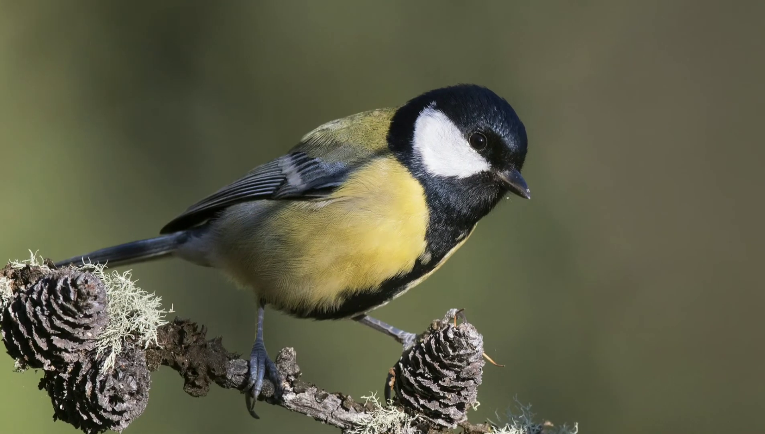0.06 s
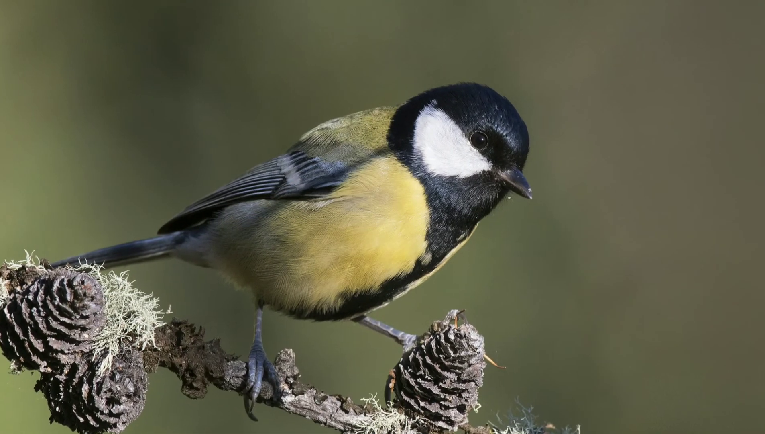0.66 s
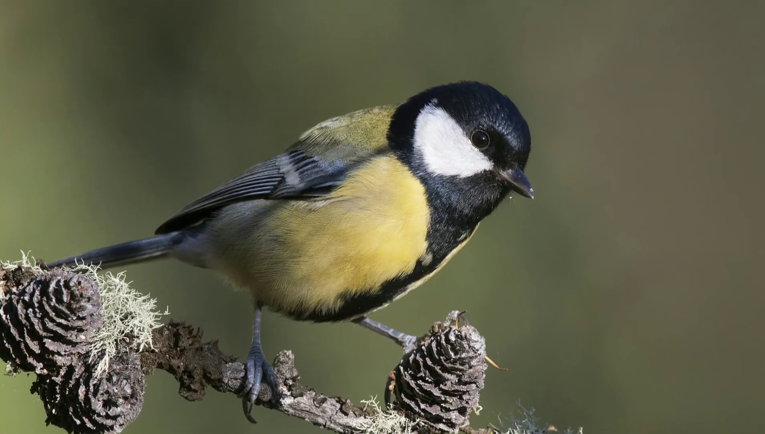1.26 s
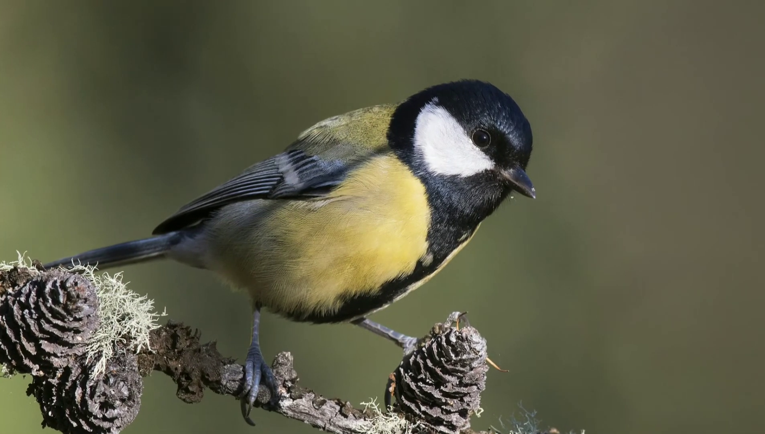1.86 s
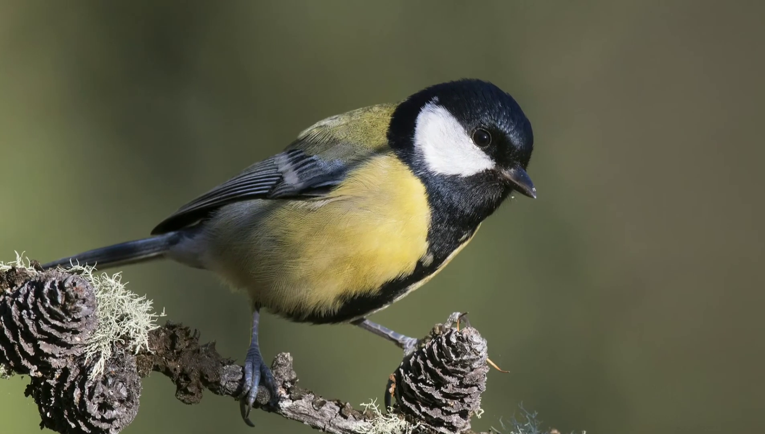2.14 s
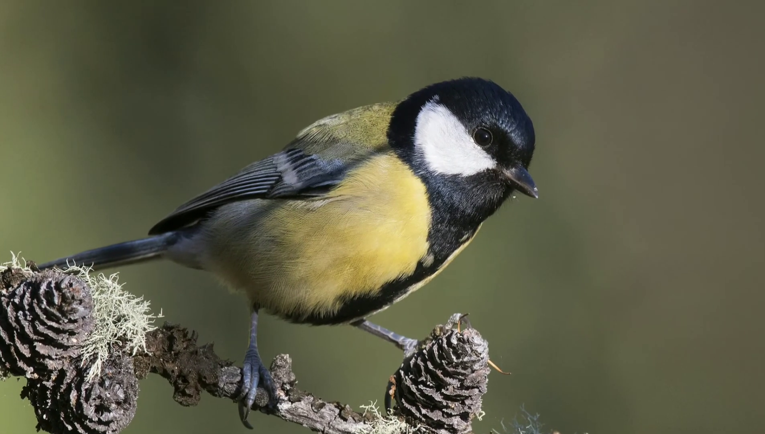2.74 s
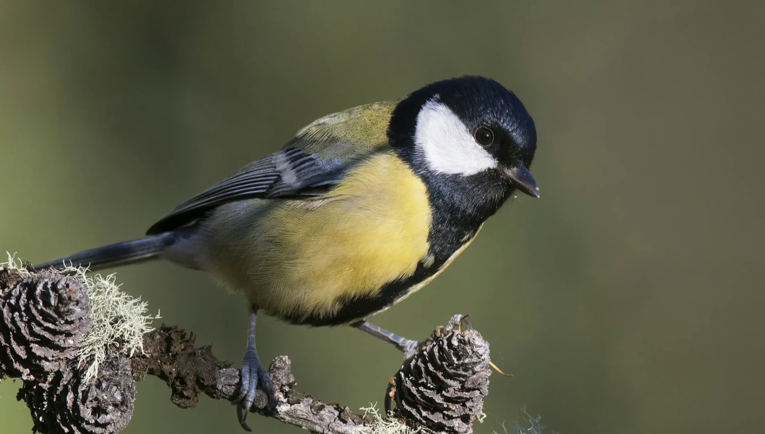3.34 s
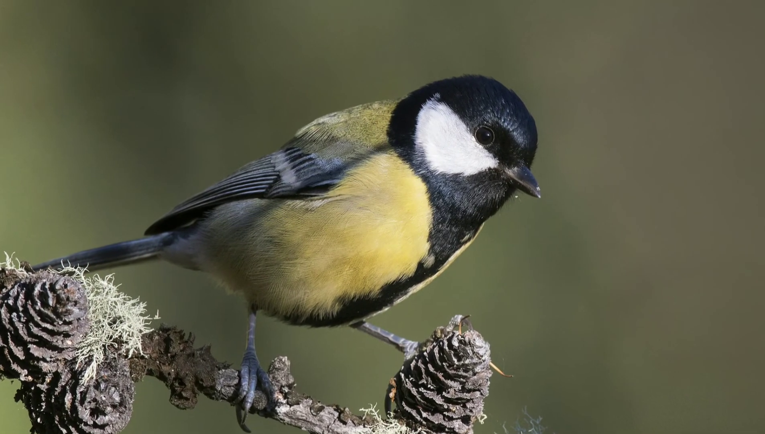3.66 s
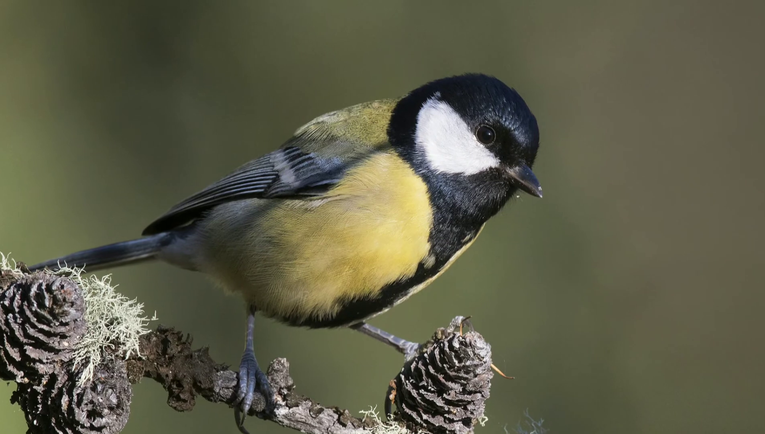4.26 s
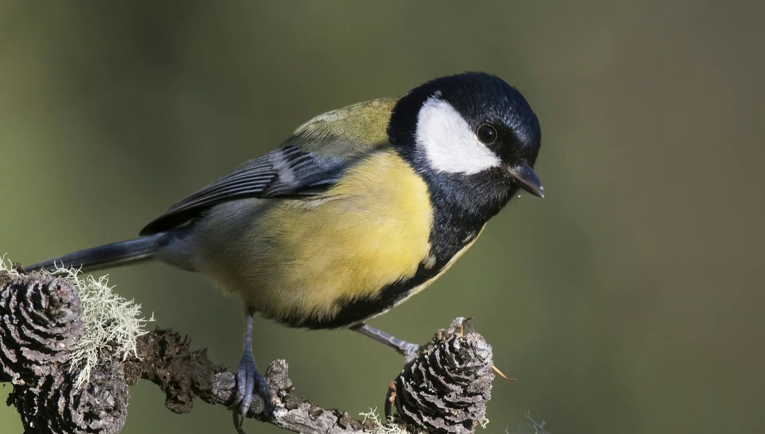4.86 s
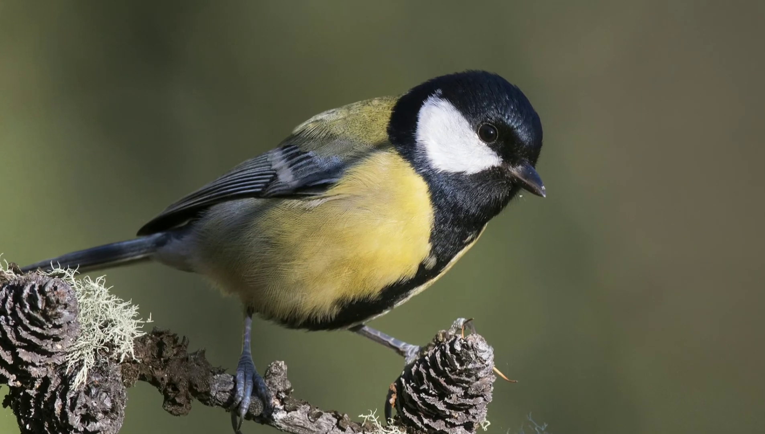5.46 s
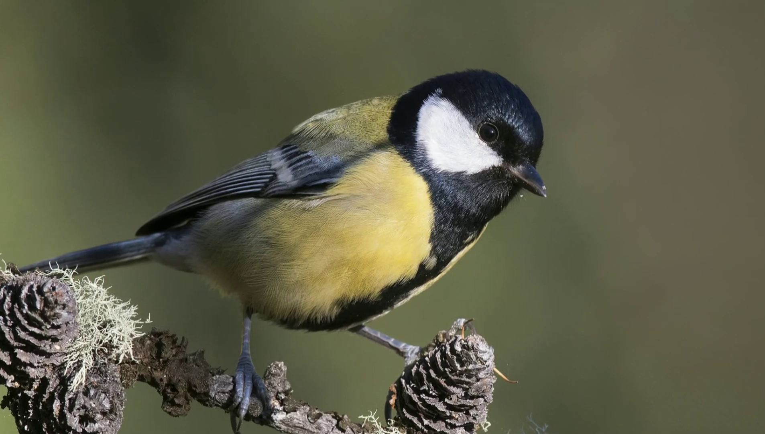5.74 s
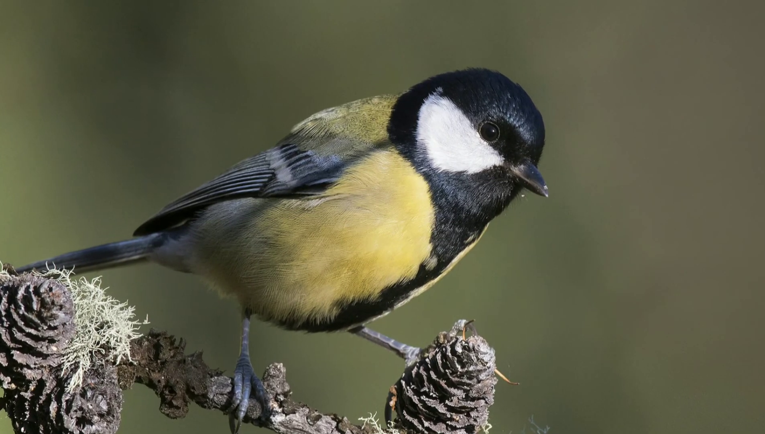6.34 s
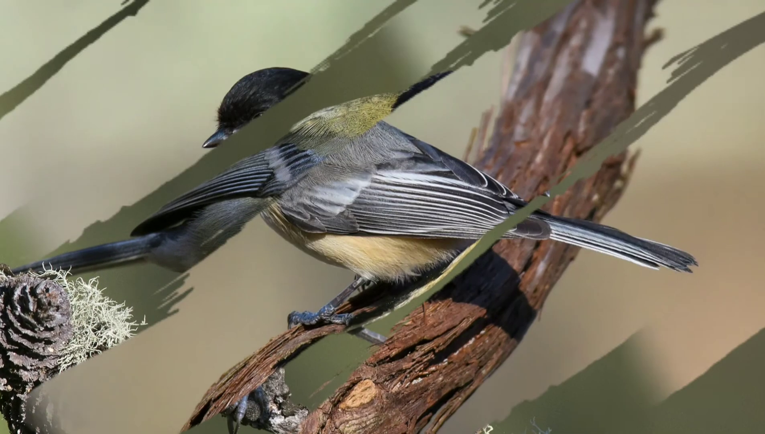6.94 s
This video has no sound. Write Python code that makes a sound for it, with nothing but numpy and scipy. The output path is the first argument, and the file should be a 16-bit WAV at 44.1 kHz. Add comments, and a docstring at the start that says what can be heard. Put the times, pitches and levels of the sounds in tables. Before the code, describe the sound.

A small songbird sings quick two-note phrases, pauses, then gives high buzzes and falling whistles over a light outdoor hiss.

```python
"""A great tit among trees, heard on one microphone, with other birds calling faintly far off.
It opens with a see-saw of a buzzy high note and a pure low one, which stops dead after two seconds.
A pause follows; then, over a duller hiss, come high buzzes and falling slurs that jump to a thin whistle.
Each note is a near-sine from the syrinx, shaken into a buzz when the membrane trembles.
On the way to the microphone, trunks and foliage scatter the notes into a long tail."""
import sys
import numpy as np
from scipy import signal
from scipy.fft import rfft, irfft
from scipy.io import wavfile
from scipy.ndimage import uniform_filter1d, minimum_filter1d

SR = 44100
rng = np.random.default_rng(int(sys.argv[2]) if len(sys.argv) > 2 else 0)


def pcm_store(signal):
    """Save signal as 16-bit PCM."""
    levels = np.round(np.clip(np.atleast_2d(signal), -1, 1) * 32767)
    wavfile.write(sys.argv[1], SR, levels.astype(np.int16).T)


N = 317520
SEE_SAW_ENDS_S, DULL_HISS_STARTS_S = 2.249, 3.335
WOOD_T60_S, NEAR_T60_S, TREBLE_T60_S = 0.92, 0.21, 0.64


def see_saw_song(t):
    """The near bird alternates two notes; a low one is still dying away among the trees as it opens."""
    # Each row: start in seconds, length in seconds, top pitch in Hz, time to the crest in seconds,
    # relative level in dB.
    low_notes = [(0.306, 0.12, 3993, 0.063, -9), (0.798, 0.14, 3921, 0.048, -7.5),
                 (1.282, 0.13, 3954, 0.049, -9), (1.774, .135, 3986, 0.11, -11.5)]
    # Each row: start in seconds, length in seconds, pitch in Hz, flick in Hz, glide in Hz per second,
    # buzz swing in Hz, relative level in dB.
    buzzy_notes = [ (.000, 0.09, 4988, 1400, -4000, 122, -12.5), (.516, 0.087, 4945, 1348, -2200, 115, -12),
                   (1.005, 0.11, 5014, 1400, -3000, 120, -11.5),
                   (1.488, 0.097, 5000, 1905, -4000, 139, -12.5),
                   (1.991, 0.093, 4860, 1986, 2199.5, 55.1, -14)]
    notes = sing(low_note, low_notes) + sing(buzzy_note, buzzy_notes)
    lingering = from_db(-31) * band_noise(hz=3850, width_hz=190) * from_db(-60 * t / WOOD_T60_S)
    song = from_db(-2) * wood(notes, near_db=-2.5, far_db=-11) + lingering
    return song * fade(SEE_SAW_ENDS_S - t, .003)


def slurred_song():
    """The near bird again: high buzz, falling slur, a leap to the whistle and a short buzz to close."""
    # Each row: start in seconds, length in seconds, base pitch in Hz, opening flick in Hz,
    # sag in Hz per second, relative level in dB.
    slurs = [(4.02, .24, 3319, 1517, 1297, -7), (4.604, 0.22, 3285, 203, 1461, -8),
             (6.912, .234, 3327, 1150, 1165, -8)]
    # Each row: start in seconds, length in seconds, pitch in Hz, leap in Hz, attack in seconds,
    # relative level in dB.
    whistles = [ (4.265, 0.032, 4544, 1936, 0.0027, -12.5), (4.307, 0.051, 4525, 297, 0.0059, -10.5),
                (4.837, 0.062, 4500, 1945, 0.0024, -10.5), (4.905, 0.047, 4540, 100, 0.016, -16.5),
                (7.149, 0.083, 4604, 1700, 0.0042, -12.5)]
    # Each row: start in seconds, length in seconds, pitch in Hz, glide in Hz per second, bend in Hz,
    # relative opening level in dB, swell in dB per second.
    high_buzzes = [ (3.662, .25, 6137, 2550, -70, -26.5, 0.5), (4.387, 0.056, 6160, 7070, 110, -19, -120),
                   (4.946, 0.08, 6057, 3470, 96, -17.5, -95), (6.56, .145, 6236, 1537, 66.5, -31.5, 69),
                   (6.686, .11, 6214, 400, -31, -30.5, 62.5)]
    pure = sing(slur, slurs) + sing(whistle, whistles)
    # throat and open beak pass only a band around the high notes
    beak = signal.butter(3, (5330, 7370), "band", fs=SR, output="sos")
    buzzes = signal.sosfilt(beak, sing(high_buzz, high_buzzes))
    return from_db(-1.5) * wood(pure + buzzes, near_db=-7.5, far_db=-10.5)


def syrinx(t, pitch, level_db, swing_hz=0, tremor_hz=212, throb=0, attack_s=0.0042,
           waver_hz=10, octave_db=-55, release_s=.018):
    """One gliding near-sine; a fast tremor of the membrane swings its pitch and loudness into a buzz."""
    wavering = pitch + waver_hz * drift(250, len(t))
    shake = 2 * np.pi * np.cumsum(tremor_hz * (1 + 0.084 * drift(90, len(t)))) / SR
    phase = 2 * np.pi * np.cumsum(wavering + swing_hz * np.cos(shake)) / SR
    # the loudness throbs at the tremor's rate, deeper as the note takes hold
    pulsing = rms_one(1 - throb * fade(t, 0.012) * np.cos(shake + 1.52))
    gain = from_db(level_db) * pulsing * fade(t, attack_s) * fade(t[-1] - t, release_s)
    return np.sqrt(2) * gain * (np.sin(phase) + from_db(octave_db) * np.sin(2 * phase))


def low_note(t, hz, crest_s, db, scoop_hz=262.3, scoop_s=0.04):
    """A nearly pure note that scoops up to its pitch, with a faint rasp just under it."""
    pitch = hz - scoop_hz * np.exp(-t / scoop_s)
    level = db + arch_db(t, crest_s, rise_db=3, decay_db_per_s=102)
    rasp = from_db(-30) * drift(800, len(t)) * syrinx(t, pitch - 99, level)
    return syrinx(t, pitch, level, attack_s=0.0066, waver_hz=22.6, octave_db=-55.5) + rasp


def buzzy_note(t, hz, flick_hz, glide, swing_hz, db, flick_s=.004):
    """The see-saw's high note: a flick from above, then a deeply throbbing glide."""
    pitch = hz + glide * t + flick_hz * np.exp(-t / flick_s)
    level = db + arch_db(t, peak_s=.04, rise_db=3.5, decay_db_per_s=113)
    return syrinx(t, pitch, level, swing_hz, tremor_hz=217.1, throb=1, attack_s=0.0043,
                  waver_hz=28, octave_db=-49.5)


def slur(t, hz, flick_hz, sag, db):
    """A loud pure note that loses pitch and strength together, with a small hook down near its end."""
    flick_s, fall_hz, fall_s = 0.0036, 315, .034
    hook_hz, hook_width_s, hook_lead_s = 119, 0.0078, 0.0246
    fall = flick_hz * np.exp(-t / flick_s) + fall_hz * np.exp(-t / fall_s)
    hook = hook_hz * np.exp(-((t[-1] - hook_lead_s - t) / hook_width_s) ** 2)
    pitch = hz + fall - sag * t - hook
    level = db + arch_db(t, peak_s=0.022, rise_db=6, decay_db_per_s=97.5)
    return syrinx(t, pitch, level, attack_s=0.0077, waver_hz=23.94, octave_db=-66)


def whistle(t, hz, leap_hz, attack_s, db, leap_s=0.00215):
    """A thin note that leaps from below and holds its pitch as it fades."""
    pitch = hz - leap_hz * np.exp(-t / leap_s)
    level = db + arch_db(t, peak_s=0.0057, rise_db=2.5, decay_db_per_s=231.5)
    return syrinx(t, pitch, level, attack_s=attack_s, waver_hz=20, octave_db=-50.5)


def high_buzz(t, hz, glide, bend_hz, db, swell):
    """A rising, slightly bent note shaken over a wide span of pitch."""
    pitch = hz + glide * t + bend_hz * np.sin(np.pi * t / t[-1])
    level = db + swell * t
    return syrinx(t, pitch, level, swing_hz=363.2, tremor_hz=217.6, throb=.45, attack_s=0.0025,
                  waver_hz=55)


def wood(x, near_db, far_db):
    """From perch to microphone: direct sound, a ground bounce, near branches and a long diffuse tail."""
    ground_delay_s, ground_db, leaf_cut_hz = 0.0096, -14.5, 5400
    t = np.arange(int(1.2 * SR)) / SR
    branches = rng.standard_normal(len(t)) * (rng.random(len(t)) < 2500 / SR)
    near = branches * fade(t, 0.0065) * from_db(-60 * t / NEAR_T60_S)
    diffuse = rng.standard_normal(len(t)) * fade(t, .05)
    # leaves and air swallow the treble sooner
    low = signal.sosfiltfilt(signal.butter(6, leaf_cut_hz, fs=SR, output="sos"), diffuse)
    far = low * from_db(-60 * t / WOOD_T60_S) + (diffuse - low) * from_db(-60 * t / TREBLE_T60_S)
    response = from_db(near_db) * near / np.linalg.norm(near)
    response += from_db(far_db) * far / np.linalg.norm(far)
    response[int(ground_delay_s * SR)] += from_db(ground_db)
    return x + signal.fftconvolve(x, response)[:N]


def far_birds(t):
    """Faint neighbours deep in the wood, which blurs their chirps into puffs of noise."""
    # Each row: start in seconds, length in seconds, pitch in Hz, glide in Hz per second,
    # buzz swing in Hz, relative level in dB.
    buzzes = [(3.546, 0.02, 2130, -29000, 250, -54), (4.458, 0.083, 2750, -900, 80, -45.5),
              (6.279, 0.17, 4930, -1100, 220, -38.5)]
    # Each row: start in seconds, length in seconds, pitch in Hz, relative level in dB.
    whistles = [ (2.310, 0.058, 3123, -63.5), (2.411, 0.056, 2916, -64.5), (2.756, .07, 3128, -69.5),
                (2.853, 0.071, 2945, -70), (3.261, 0.049, 3190, -66), (3.874, 0.091, 1278, -70.5),
                (3.879, 0.098, 2356, -63), (4.445, 0.093, 1735, -67.5), (5.1, .1, 5360, -54.5),
                (6.285, 0.057, 3530, -52.5), (6.882, 0.054, 3450, -48)]
    # Each row: centre in seconds, half-length in seconds, centre in Hz, half-width in Hz, level in dB.
    chirps = [(0.36, 0.04, 2206, 200, -56.5), (0.841, 0.057, 2144, 200, -65.5),
              (3.388, 0.042, 3330, 847.6, -46), (5.473, 0.098, 3360, 667, -51.5),
              (6.733, 0.15, 3450, 691, -56)]
    calls = sing(far_buzz, buzzes) + sing(far_whistle, whistles)
    blurred = sum(from_db(db) * band_noise(hz, width_hz) * np.exp(-2 * ((t - centre_s) / span_s) ** 2)
                  for centre_s, span_s, hz, width_hz, db in chirps)
    return from_db(-0.5) * wood(calls, near_db=-4.5, far_db=-6) + blurred


def far_buzz(t, hz, glide, swing_hz, db):
    """A neighbour's short, fading buzz."""
    level = db + arch_db(t, peak_s=0.017, rise_db=1.5, decay_db_per_s=93.5)
    return syrinx(t, hz + glide * t, level, swing_hz, throb=0.25, waver_hz=60.9)


def far_whistle(t, hz, db):
    """A neighbour's soft, unsteady whistle."""
    return syrinx(t, hz, db, attack_s=.016, waver_hz=34.8)


def air(t):
    """Light hiss over a faint drone; it drops after the see-saw, dips briefly and comes back duller."""
    # The colour of the hiss under the see-saw, in the pause and under the slurred song.
    # Each row: frequency in Hz, relative level in dB.
    opening_colour = [(40, -31.5), (130, -15), (200, -12), (380, -5), (780, -10), (1000, -7), (1450, -16.5),
                      (2200, -4), (3200, 0), (8000, 1.5), (15500, -3)]
    pause_colour = [(40, -28), (80, -27), (200, -10), (420, 0.5), (780, -6.5), (1000, -4.5), (1550, -11.5),
                    (3000, 2), (8000, 1), (15500, -3.5)]
    dull_colour = [(40, -32.5), (80, -31), (200, -20), (420, -15.5), (780, -20), (1250, -21), (2200, -7.5),
                   (3200, -1), (6500, -2), (9500, -7), (13000, -19), (15500, -21.5)]
    opening = fade(SEE_SAW_ENDS_S - t, 0.0036)
    pause = (1 - opening) * fade(DULL_HISS_STARTS_S - t, 0.026)
    closing = fade(t - DULL_HISS_STARTS_S, 0.011)
    # a low distant rush swells under the see-saw by 3 dB a second
    rush = from_db(-70 + 3 * (t - SEE_SAW_ENDS_S)) * band_noise(hz=413, width_hz=260)
    drone = from_db(-84.5) * band_noise(hz=443, width_hz=100)
    return (opening * (from_db(-52) * hiss(opening_colour) + rush)
            + pause * from_db(-56.5) * hiss(pause_colour)
            + closing * from_db(-53) * hiss(dull_colour)
            + drone)


def hiss(colour):
    """Steady noise of a given colour, rms 1."""
    hz, db = np.transpose(colour)
    f = np.maximum(np.fft.rfftfreq(N, 1 / SR), 1)
    gain = from_db(np.interp(np.log(f), np.log(hz), db))
    return rms_one(irfft(rfft(rng.standard_normal(N)) * gain, N))


def band_noise(hz, width_hz):
    """Noise in one bell-shaped band, rms 1."""
    f = np.fft.rfftfreq(N, 1 / SR)
    bell = np.exp(-2 * ((f - hz) / width_hz) ** 2)
    return rms_one(irfft(rfft(rng.standard_normal(N)) * bell, N))


def sing(note, rows):
    """Play one kind of note for every row of its table."""
    out = np.zeros(N)
    for start_s, length_s, *traits in rows:
        sound = note(np.arange(int(length_s * SR)) / SR, *traits)
        at = round(start_s * SR)
        out[at:at + len(sound)] += sound[:N - at]
    return out


def arch_db(t, peak_s, rise_db, decay_db_per_s):
    """Level of a note that swells to its peak and then dies away."""
    return np.minimum(rise_db * (t / peak_s - 1), decay_db_per_s * (peak_s - t))


def fade(t, length_s):
    """Smooth step from 0 at t = 0 to 1 at length_s."""
    return np.sin(np.pi / 2 * np.clip(t / length_s, 0, 1)) ** 2


def drift(rate, size):
    """Random wandering of spread about 1."""
    knots = rng.standard_normal(4096)
    return np.interp(np.arange(size) * rate / SR, np.arange(len(knots)), knots)


def from_db(db):
    """Decibels to gain."""
    return 10 ** (np.asarray(db) / 20)


def rms_one(x):
    """Scale to rms 1."""
    return x / np.sqrt(np.mean(x ** 2) + 1e-20)


def scene():
    """Both songs, the neighbours and the air, as they reach one microphone."""
    t = np.arange(N) / SR
    return (see_saw_song(t) + slurred_song() + far_birds(t) + air(t))[None]


def record(dry):
    """A smooth limiter holds peaks under full scale, the end is eased out and the top is cut steeply."""
    ceiling, cutoff_hz = .9, 15500
    safe_gain = minimum_filter1d(np.minimum(1, ceiling / (np.abs(dry) + 1e-9)), size=601)
    held = dry * uniform_filter1d(uniform_filter1d(safe_gain, size=301), size=301)
    eased = held * fade(np.arange(N)[::-1] / SR, .003)
    return signal.sosfilt(signal.ellip(12, .1, 90, cutoff_hz, fs=SR, output="sos"), eased)


dry = scene()
out = record(dry)
pcm_store(out)
```